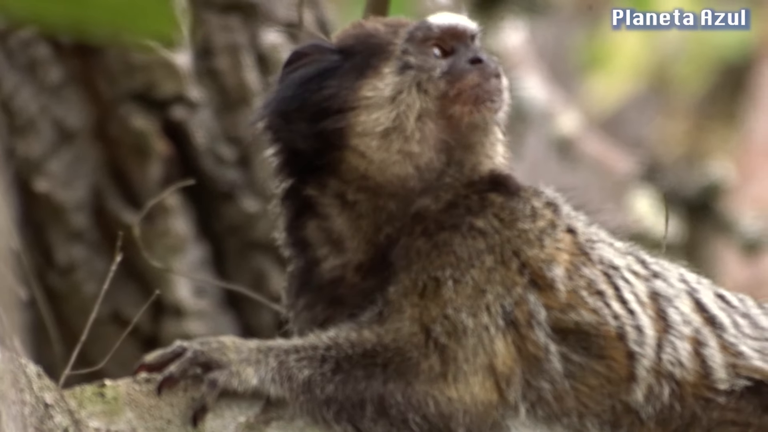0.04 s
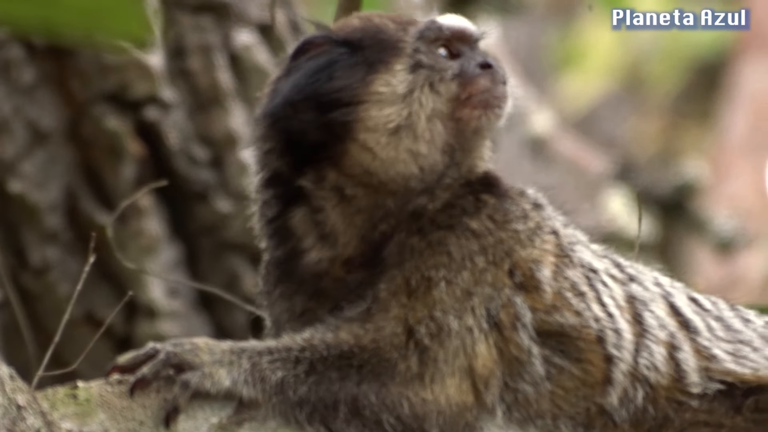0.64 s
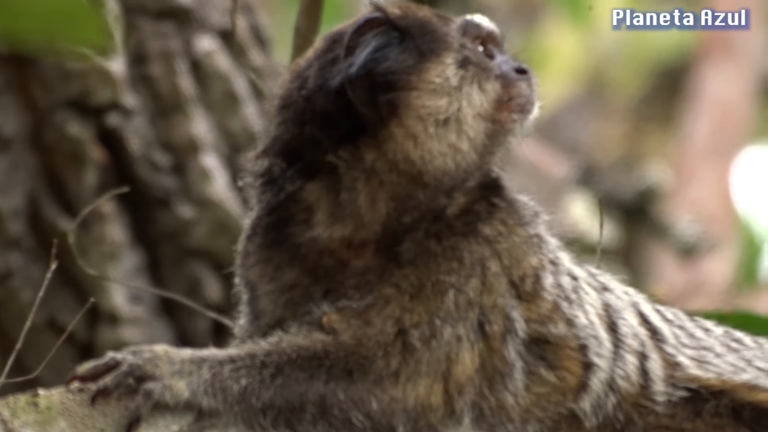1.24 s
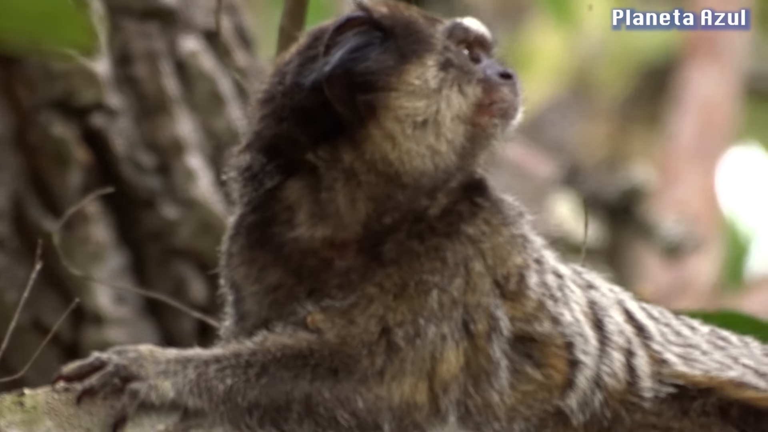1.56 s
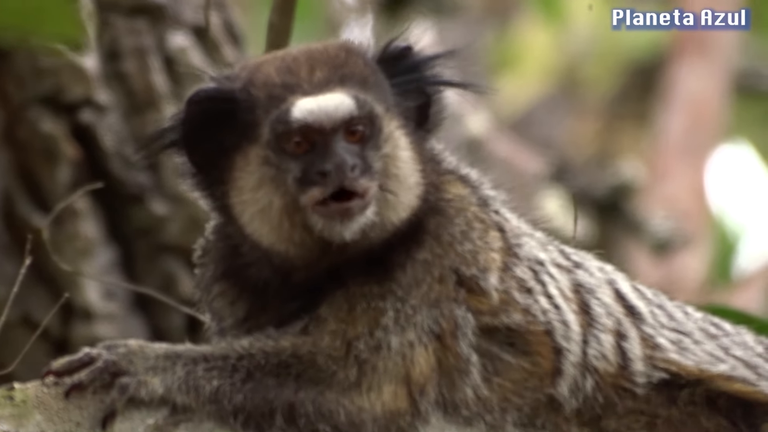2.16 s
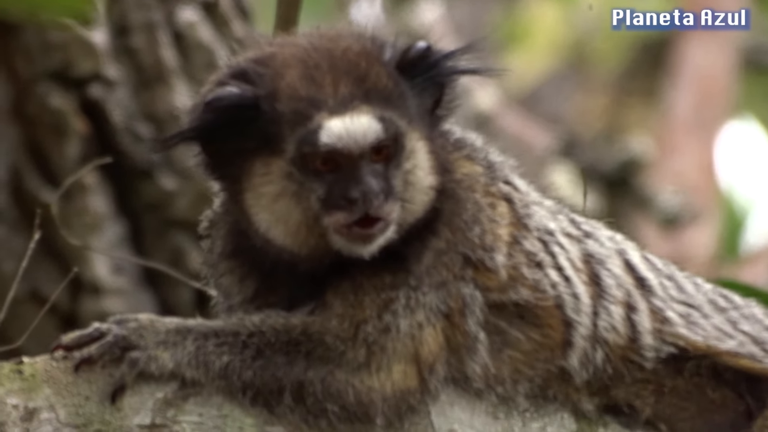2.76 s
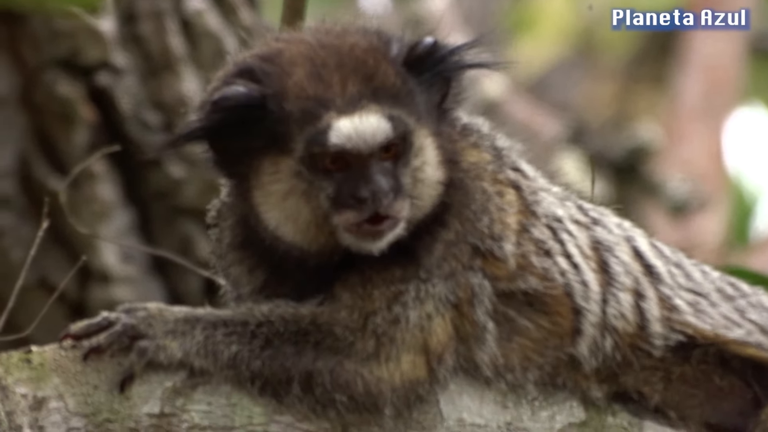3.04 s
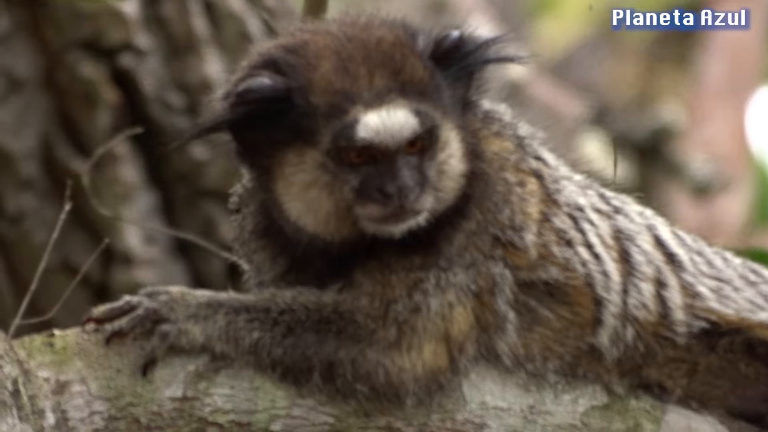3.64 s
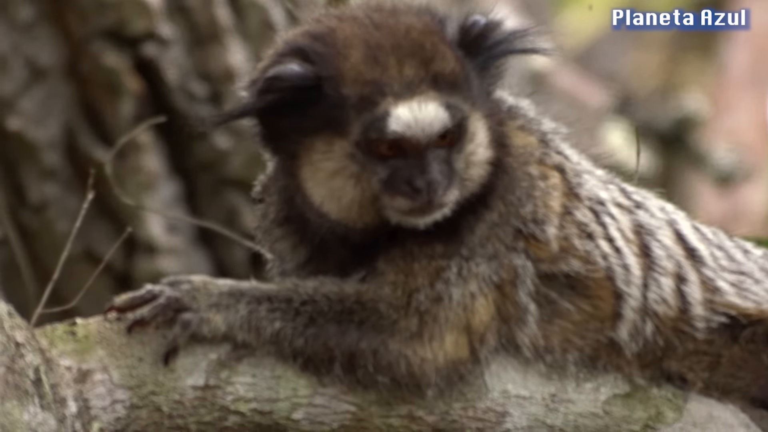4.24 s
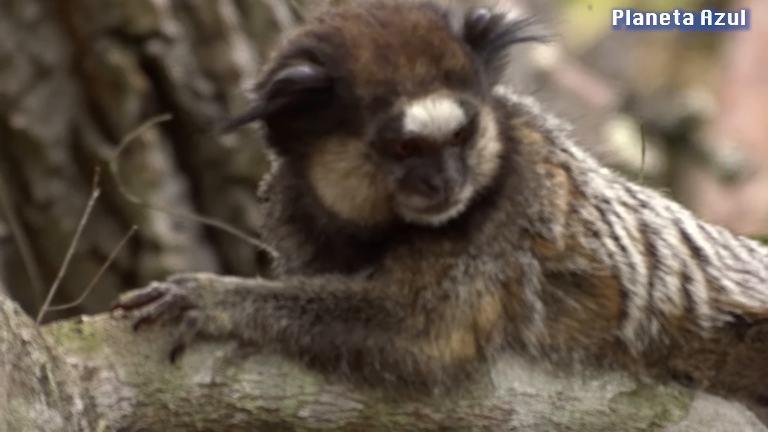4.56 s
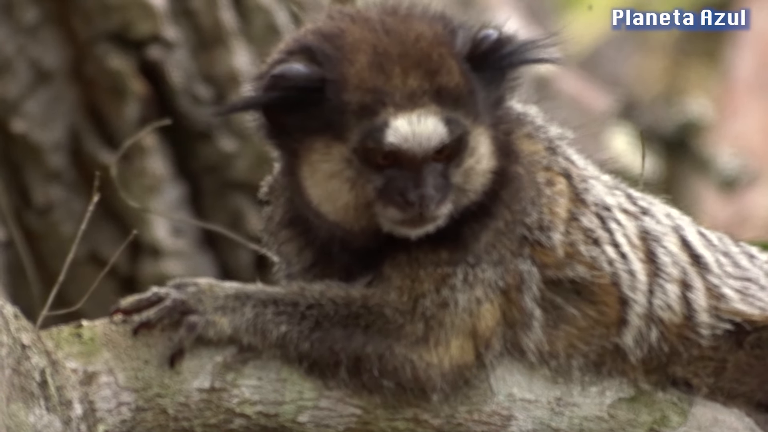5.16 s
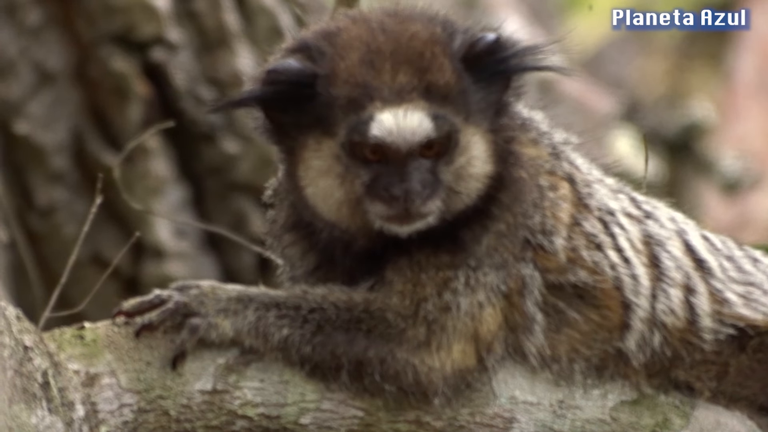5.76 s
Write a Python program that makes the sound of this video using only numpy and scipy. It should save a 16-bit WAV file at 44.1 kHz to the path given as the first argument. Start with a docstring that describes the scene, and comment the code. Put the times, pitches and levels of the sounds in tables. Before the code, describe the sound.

Outdoors, a marmoset close to the microphone gives two long, very high whistles, the first trilled and the second smoother, each rising slightly and growing louder. Five short, sharp chirps follow, spaced up to a second apart, with a slight echo from nearby surfaces. Far behind, a motor hums, insects drone and birds call faintly over a dull rush and a thin hiss.

```python
"""Outdoors, near reflecting surfaces: a close marmoset gives two long high whistles, the first trilled,
then five sharp chirps. Each whistle is a frequency-modulated pure tone; each chirp plunges in pitch
through a mouth resonance. The surfaces throw the calls back. Behind, a far motor hums at multiples of
its turning rate, insects drone in narrow bands and birds call faintly over a dull rush and thin hiss."""
import sys
import numpy as np
from scipy import signal
from scipy.fft import rfft, irfft
from scipy.io import wavfile
from scipy.ndimage import uniform_filter1d

SR = 44100
rng = np.random.default_rng(int(sys.argv[2]) if len(sys.argv) > 2 else 0)


def waveform_to_disk(signal):
    """Save audio, clipped to [-1, 1], as 16-bit WAV at the path in sys.argv[1]."""
    frames = np.transpose(np.atleast_2d(signal))
    scaled = np.clip(frames, -1, 1) * 32767
    samples = np.round(scaled).astype(np.int16)
    wavfile.write(sys.argv[1], SR, samples)


N = 264776
TIME = np.arange(N) / SR

# whistle contours: (time [s], pitch [Hz])
TRILLED_PITCH = [(0.22, 5460), (0.379, 5680), (0.45, 5913), (0.8, 6323), (1.03, 6444), (1.439, 6465),
                 (1.476, 6280), (1.507, 5940)]
PLAIN_PITCH = [(1.681, 5280), (1.709, 5510), (1.798, 5696), (1.908, 5693), (2.022, 5795), (2.172, 5830),
               (2.3, 5970), (2.391, 6036), (2.496, 5998), (2.561, 5950)]
# (attack [s], peak time [s], peak level [dB], initial swing [Hz], swing decay [s],
#  initial roughness [Hz], throb [dB], diffuse gain [dB], left minus right [dB])
WHISTLES = [(0.21, 1.31, -18, 164, 0.95, 75, 2.8, 0, -2),
            (0.037, 2.255, -19.5, 26, 3, 6.6, 2.2, -1.5, -1.3)]
# (time [s], length [s], end pitch [Hz], level [dB], mouth resonance [Hz], its boost [dB], low end [dB])
CHIRPS = [(2.592, 0.016, 2740, -2, 8050, 3.5, -2), (3.2255, 0.016, 2094, -4, 9800, 1.5, 2),
          (3.959, 0.018, 2140, -5.5, 7470, 5.5, 2.5), (4.9625, 0.0096, 5480, -8.5, 8540, 11, -6),
          (5.9164, 0.016, 2640, -8.5, 8500, 1, -2.5)]
# voice strength along a chirp: (pitch [Hz], gain [dB])
CHIRP_COLOUR = [(2000, -8), (2600, -12), (3200, -29), (3700, -21), (4600, -24.5), (5900, -6), (7000, -2),
                (7900, -8), (10200, -0.5), (12000, -13)]
# rising lead-ins to calls: (time [s], length [s], start pitch [Hz], end pitch [Hz], level [dB])
UPSLURS = [(0.219, 0.068, 10360, 11000, -51.5), (2.537, 0.036, 8800, 11370, -21),
           (4.914, 0.0091, 10220, 11350, -19), (5.868, 0.019, 9560, 11200, -22)]
# ticks ahead of chirps: (time [s], level [dB])
TICKS = [(3.947, -38), (3.948, -32), (4.948, -32.5), (5.87, -32.5)]
# nearby surfaces: (delay [s], gain [dB])
ECHOES = [(0.0017, -13.5), (0.0056, -14.5), (0.0088, -23.5)]
# diffuse reflections: (T60 [s], gain [dB])
DIFFUSE = [(0.054, -2.5), (0.21, -5.5), (0.5, -24)]
# nasal bird: (time [s], pitch [Hz], level [dB])
NASAL_NOTES = [(1.847, 1067, -49.5), (1.966, 1034, -57), (2.718, 1075, -47), (2.827, 1078, -55.5),
               (5.143, 1048, -54), (5.684, 1109, -62)]
# its harmonics: (multiple, gain [dB])
NASAL_HARMONICS = [(2, -6.5), (3, 3.5), (4, -3), (5, -12), (6, -1.5), (7, 2), (8, 8.5)]
# warbling bird: (time [s], length [s], start pitch [Hz], end pitch [Hz], level [dB])
WARBLE_NOTES = [(0.03, 0.03, 3400, 3250, -58), (1.32, 0.02, 2800, 2650, -56),
                (1.485, 0.091, 2730, 2640, -56.5), (1.62, 0.067, 2600, 1890, -59),
                (1.69, 0.079, 2080, 1970, -60), (1.85, 0.053, 2900, 1880, -53),
                (1.945, 0.035, 1850, 2520, -56), (1.985, 0.1, 2480, 2216, -57.5),
                (5.67, 0.027, 2800, 2996, -56.5), (5.697, 0.018, 4330, 4400, -53),
                (5.715, 0.055, 3000, 2885, -54), (5.742, 0.03, 5820, 5660, -60),
                (5.882, 0.029, 3020, 2870, -51)]
# low motor tones: (multiple, level [dB])
MOTOR_LOW = [(1, -64), (2, -66.5), (3, -61), (4, -60.5), (5, -65.5)]
# upper motor tones: (multiple, gain [dB])
MOTOR_UPPER = [(6, -1), (7, -9.5), (9, -30)]
# their swells: (peak time [s], height [dB], rise [s], decay [s])
MOTOR_SWELLS = [(1.3, 7, 0.6, 0.15), (3.0, 18.7, 0.79, 2.0), (5.3, 3.5, 0.43, 0.74)]
# (centre [Hz], width [Hz], level [dB], throb depth [0-1], throb rate [Hz])
INSECTS = [(3551, 115, -53, 0.12, 37), (6960, 280, -61.5, 0.8, 4.8), (7210, 140, -67, 0.7, 27),
           (8752, 310, -54.5, 0.08, 24)]
# noise shapes: (frequency [Hz], relative density [dB])
RUSH_SPECTRUM = [(25, -23), (60, -5), (100, -11), (200, -13), (330, -6), (450, -6), (570, -13.5),
                 (750, -9.5), (900, -4), (1030, -24.5), (1280, -8), (1500, -23), (1900, -32), (2600, -69.5)]
HISS_SPECTRUM = [(1500, 1.5), (1900, -8), (2400, 5.5), (3100, -3.5), (4200, -8), (5500, -10.5),
                 (6500, -10.5), (8000, -13), (9500, -5), (11000, -5), (11800, -21)]
# hollow bands: (centre [Hz], width [Hz], level re rush [dB])
RUSH_BANDS = [(694.4, 18, -15), (848, 33, -5), (1214, 77, -10.5), (1363, 43, -15)]
# background noise between the ears: (frequency [Hz], correlation [0-1])
EAR_CORRELATION = [(40, 0.98), (130, 0.94), (350, 0.54), (600, 0.5), (1100, 0.2), (2500, 0.5), (8000, 0.84)]
# (frequency [Hz], left minus right [dB])
EAR_BALANCE = [(40, 0), (250, -0.5), (600, 3), (1200, 3), (3000, 0.5), (9000, -0.5)]


def whistle(contour, attack_s, peak_s, level_db, swing_hz, narrow_s, rough_hz, throb_db, wet_db, left_db):
    """Pure tone, loudest at the bottom of each trill swing; the trill slows, narrows and smooths."""
    start_s, end_s = contour[0][0], contour[-1][0]
    settle_s, still_s, dip_s = 0.35, 2.02, 2.168
    attack_db, swell_db_per_s, sag_db_per_s = 21.5, 15.5, 18.5
    unsettled = np.exp(-since(start_s) / settle_s)
    rate_hz = (24.5 + 22 * unsettled) * (1 + .12 * drift(25))
    # second whistle: the trill pauses, then the level dips briefly
    pause = gate(still_s, dip_s, .03, .01)
    dip_db = -15.5 * np.exp(-((TIME - dip_s) / .012) ** 2)
    quiver = np.sin(phase_of(rate_hz)) * (1 + .22 * drift(20)) * (1 - pause)
    trill_hz = swing_hz * np.exp(-since(start_s) / narrow_s) * quiver
    jitter_hz = (8 + rough_hz * unsettled) * drift(300)
    pitch_hz = np.interp(TIME, *np.transpose(contour)) + trill_hz + jitter_hz
    tone = np.sin(phase_of(pitch_hz)) * from_db(-throb_db * quiver)
    heard = reflections(tone * gate(start_s, end_s, .008, .0062), wet_db)
    # echoes beat against the tone: slow beats are levelled, fast ones stay
    during = (TIME > start_s) & (TIME < end_s)
    power = uniform_filter1d(np.mean(heard[:, during] ** 2, axis=0), size=SR // 12)
    levelled = heard / np.sqrt(np.interp(TIME, TIME[during], power))
    effort_db = -attack_db * np.minimum(until(start_s + attack_s) / attack_s, 1)
    effort_db -= swell_db_per_s * until(peak_s) + sag_db_per_s * since(peak_s)
    return pan(levelled * from_db(level_db + effort_db + dip_db), left_db)


def chirps(top_hz=12370, bend=1.25, mouth_width_hz=500, jitter_hz=200, rasp_db=-33, roughness=0.29):
    """The voice plunges over an octave in 10-18 ms, flaring as it crosses the mouth resonance."""
    out = np.zeros(N)
    unsteady_hz = jitter_hz * drift(2500)
    noise = rms_one(butterworth(rng.standard_normal(N), [2600, 11000], "band"))
    for start_s, length_s, end_hz, level_db, mouth_hz, mouth_db, low_db in CHIRPS:
        end_s = start_s + length_s
        remaining = 1 - np.clip((TIME - start_s) / length_s, 0, 1)
        hz = end_hz + (top_hz - end_hz) * remaining ** bend
        colour_db = at_hz(CHIRP_COLOUR, hz) + low_db * np.clip((5500 - hz) / 1000, 0, 1)
        flare_db = mouth_db / (1 + ((hz - mouth_hz) / mouth_width_hz) ** 2)
        voice = np.sin(phase_of(hz + unsteady_hz)) * gate(start_s, end_s, .00095, .0021)
        # forced chirps, with a strong low end, rasp more
        rasp = from_db(rasp_db + low_db) * noise * gate(start_s - .004, end_s, .0046, .0051)
        out += from_db(level_db) * (from_db(colour_db + flare_db) * voice + rasp)
    out *= 1 + roughness * drift(1500)
    return butterworth(butterworth(out, 1900, "high"), 1900, "high")


def ticks(t60_s=0.0089):
    """Tiny bright noise bursts that die at once."""
    bright = rms_one(butterworth(rng.standard_normal(N), 2800, "high"))
    return bright * sum(from_db(db - 60 * np.minimum(since(s) / t60_s, 2)) * (TIME > s)
                        for s, db in TICKS)


def glides(notes, fade_db=4):
    """Thin pure notes that slide in pitch and fade."""
    out = np.zeros(N)
    for start_s, length_s, start_hz, end_hz, level_db in notes:
        progress = np.clip((TIME - start_s) / length_s, 0, 1)
        hz = start_hz + (end_hz - start_hz) * progress ** .8
        envelope = from_db(level_db - fade_db * progress) * gate(start_s, start_s + length_s, .0025, .0045)
        out += envelope * np.sin(phase_of(hz))
    return out


def reflections(x, wet_db, spread=0.29, low_cut_hz=3800, onset_s=0.00394):
    """Direct sound, near echoes, then bright scatter and a short tail, in stereo."""
    t = TIME[:SR // 2]
    mid, side = rng.standard_normal((2, len(t)))
    power = np.zeros(len(t))
    for t60_s, gain_db in DIFFUSE:
        decay = from_db(-60 * t / t60_s) * (t > onset_s)
        power += from_db(gain_db + wet_db) ** 2 * decay ** 2 / np.sum(decay ** 2)
    scatter = np.sqrt(power) * (mid + spread * side * np.array([[1], [-1]]))
    response = butterworth(scatter, low_cut_hz, "high")  # small surfaces scatter only short waves
    response[:, 0] += 1
    for delay_s, gain_db in ECHOES:
        response[:, round(delay_s * SR)] += from_db(gain_db)
    return signal.fftconvolve(x[None], response, axes=1)[:, :N]


def nasal_bird(note_s=0.0355, roughness=0.011, fall=0.0564, arch=0.04):
    """Short harmonic stacks that arch and sag in pitch."""
    out = np.zeros(N)
    waver = 1 + roughness * drift(400)
    for start_s, pitch_hz, level_db in NASAL_NOTES:
        on = (TIME > start_s) & (TIME < start_s + note_s)
        progress = (TIME[on] - start_s) / note_s
        swell = np.sin(np.pi * progress)
        bend = 1 - fall * (progress - .5) + arch * (swell - 1)
        phase = phase_of(pitch_hz * waver[on] * bend)
        out[on] += swell * sum(from_db(level_db + db) * np.sin(k * phase) for k, db in NASAL_HARMONICS)
    return out


def motor(turn_hz=57.95, speedup_hz_per_s=0.22, wander=0.0039, rest_db=-56.5):
    """Multiples of a slowly rising turning rate; low ones rise, hold and sink, upper ones swell."""
    phase = phase_of((turn_hz + speedup_hz_per_s * TIME) * (1 + wander * drift(9)))
    low_db = plateau_db(2.3, 4.2, rise_db_per_s=6.5, sink_db_per_s=3)
    upper_db = rest_db + sum(db * np.maximum(1 - until(s) / rise_s, 0) * np.exp(-since(s) / decay_s)
                             for s, db, rise_s, decay_s in MOTOR_SWELLS)
    tones = [(k, low_db + db + 3 * drift(6)) for k, db in MOTOR_LOW]
    tones += [(k, upper_db + db + 1.5 * drift(10)) for k, db in MOTOR_UPPER]
    return np.sqrt(2) * sum(from_db(db) * np.sin(k * phase + 2 * np.pi * rng.random()) for k, db in tones)


def insects():
    """Many far insects merge into narrow throbbing bands."""
    out = 0
    for centre_hz, width_hz, level_db, depth, rate_hz in INSECTS:
        phase = phase_of(rate_hz * (1 + .23 * drift(5.4)))
        throb = 1 + depth * np.sin(phase) * (1 + .33 * drift(3.9))
        out += from_db(level_db) * throb * narrow_noise(centre_hz, width_hz)
    return out


def hollow_tone(centre_hz=678, width_hz=24, level_db=-53):
    """A faint, far band of noise swells once."""
    return from_db(level_db) * narrow_noise(centre_hz, width_hz) * gate(1.47, 2.21, .14, .16)


def distant_rush(level_db=-46):
    """Dull outdoor noise with a few hollow bands."""
    rush = wide_noise(lambda hz: from_db(at_hz(RUSH_SPECTRUM, hz)))
    rush += sum(from_db(db) * narrow_noise(hz, width_hz) for hz, width_hz, db in RUSH_BANDS)
    return from_db(level_db) * rush


def hiss(level_db=-56):
    """Thin, even noise."""
    return from_db(level_db) * wide_noise(lambda hz: from_db(at_hz(HISS_SPECTRUM, hz)))


def wide_noise(gain_at):
    """Coloured stereo noise, alike in both ears in the bass; rms 1."""
    hz = np.arange(N // 2 + 1) * SR / N
    mid, side = rfft(rng.standard_normal((2, N))) * gain_at(hz)
    correlation = at_hz(EAR_CORRELATION, hz)
    ears = np.array([[1], [-1]])
    spectrum = np.sqrt(1 + correlation) * mid + np.sqrt(1 - correlation) * side * ears
    return rms_one(irfft(spectrum * from_db(ears * at_hz(EAR_BALANCE, hz) / 2), N))


def narrow_noise(centre_hz, width_hz):
    """Noise twice through one resonance."""
    return wide_noise(lambda hz: 1 / (1 + ((hz - centre_hz) / (.75 * width_hz)) ** 2))


def drift(rate_hz):
    """Random wander; rms 1."""
    knots = rng.standard_normal(int(rate_hz * N / SR) + 3)
    return rms_one(np.interp(TIME * rate_hz, np.arange(len(knots)), knots))


def gate(start_s, end_s, attack_s, release_s):
    """Smooth on/off window."""
    opening = np.clip((TIME - start_s) / attack_s, 0, 1) * np.clip((end_s - TIME) / release_s, 0, 1)
    return np.sin(np.pi / 2 * opening) ** 2


def plateau_db(start_s, end_s, rise_db_per_s, sink_db_per_s):
    """Rise, hold 0 dB from start to end, sink."""
    return -rise_db_per_s * until(start_s) - sink_db_per_s * since(end_s)


def since(time_s):
    """Seconds after a moment; 0 before."""
    return np.maximum(TIME - time_s, 0)


def until(time_s):
    """Seconds before a moment; 0 after."""
    return np.maximum(time_s - TIME, 0)


def butterworth(x, edge_hz, kind):
    """Butterworth filter, 12 dB per octave."""
    return signal.sosfilt(signal.butter(2, edge_hz, kind, fs=SR, output="sos"), x)


def at_hz(points, hz):
    """Interpolate on a log-frequency axis."""
    knots_hz, values = np.transpose(points)
    return np.interp(np.log(np.maximum(hz, 1)), np.log(knots_hz), values)


def phase_of(hz):
    """Running oscillator phase [rad]."""
    return 2 * np.pi * np.cumsum(hz) / SR


def pan(x, left_db):
    """Place by left minus right level."""
    return x * from_db([[left_db / 2], [-left_db / 2]])


def from_db(db):
    """Decibels to gain."""
    return 10 ** (np.asarray(db) / 20)


def rms_one(x):
    """Scale to rms 1."""
    return x / np.sqrt(np.mean(x ** 2) + 1e-20)


def scene():
    """Marmoset near the centre, the rest far behind."""
    whistles = sum(whistle(contour, *row) for contour, row in zip((TRILLED_PITCH, PLAIN_PITCH), WHISTLES))
    short_calls = reflections(chirps() + ticks() + glides(UPSLURS), wet_db=-1.36)
    birds = reflections(nasal_bird() + glides(WARBLE_NOTES), wet_db=3, spread=0.36, low_cut_hz=1500)
    bed_db = plateau_db(1.42, 3.31, rise_db_per_s=4.5, sink_db_per_s=1.62)
    bed = from_db(bed_db) * (distant_rush() + insects() + hiss())
    return whistles + short_calls + birds + bed + pan(motor(), left_db=3.5) + hollow_tone()


def record(dry, edge_hz=11130, trace_db=-31, ceiling=0.97, cutoff_hz=14000):
    """Top treble drops to a trace, the loudest chirps clip, a steep low-pass follows."""
    edge, cut = (signal.firwin(301, hz, window=("kaiser", 8), fs=SR)[None] for hz in (edge_hz, cutoff_hz))
    dull = signal.fftconvolve(dry, edge, mode="same", axes=1) + from_db(trace_db) * dry
    return signal.fftconvolve(np.clip(dull, -ceiling, ceiling), cut, mode="same", axes=1)


dry = scene()
out = record(dry)
waveform_to_disk(out)
```